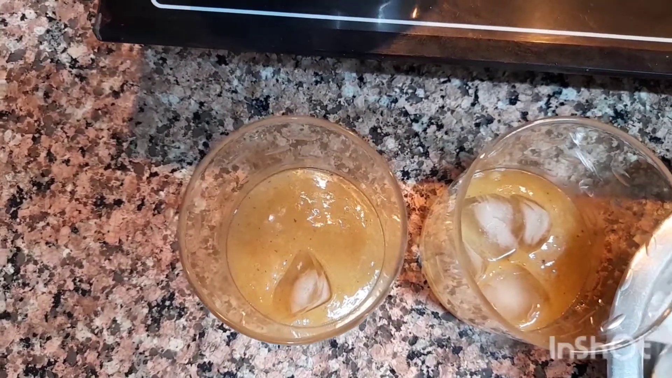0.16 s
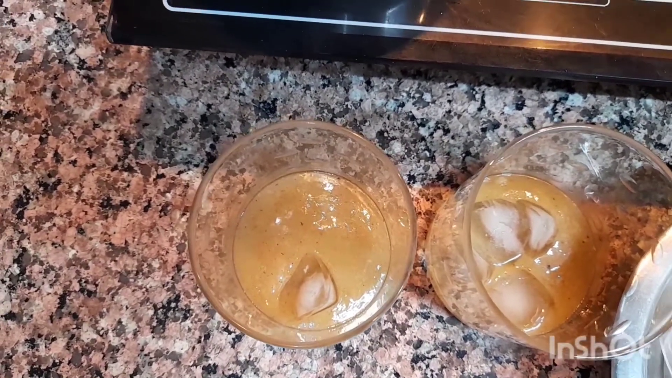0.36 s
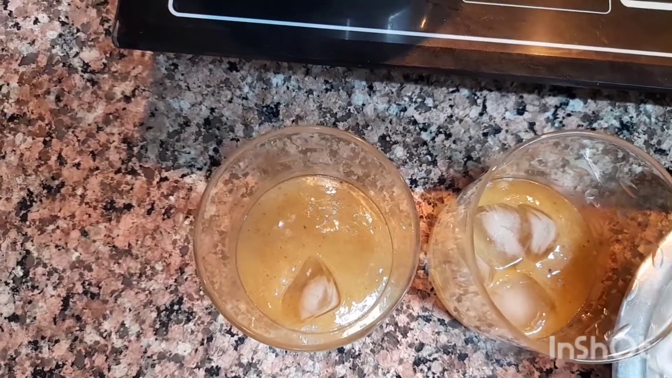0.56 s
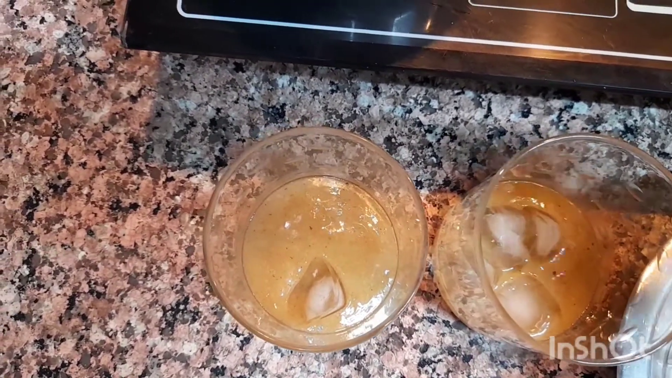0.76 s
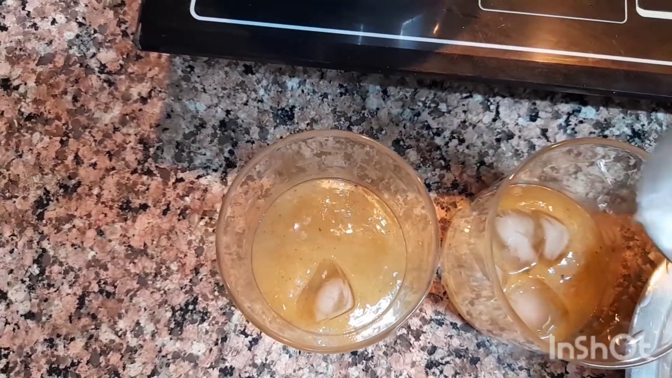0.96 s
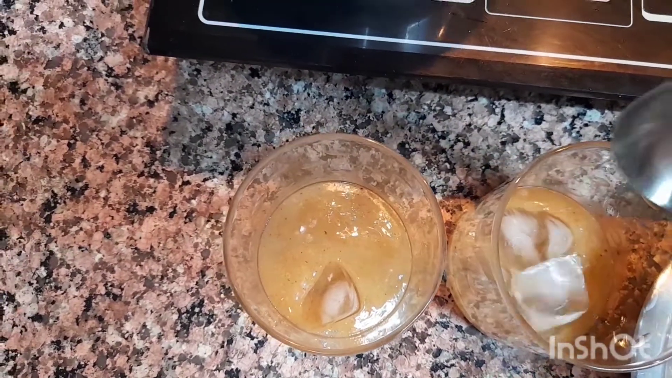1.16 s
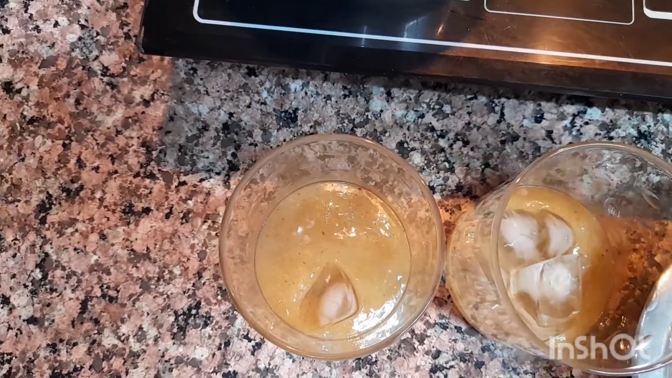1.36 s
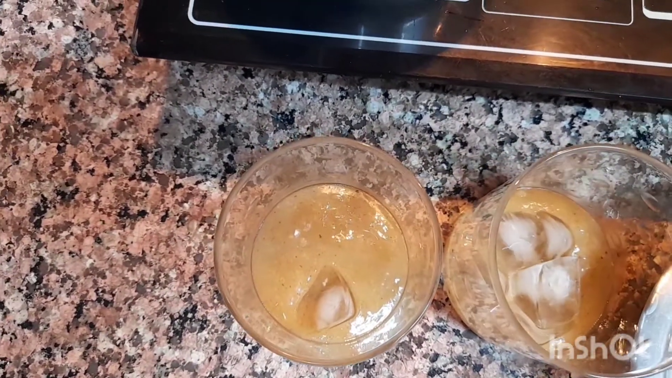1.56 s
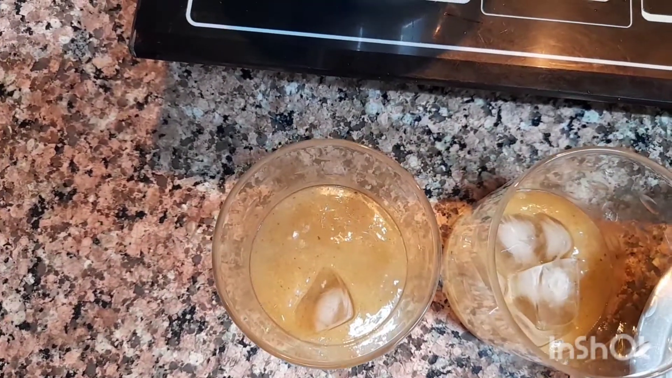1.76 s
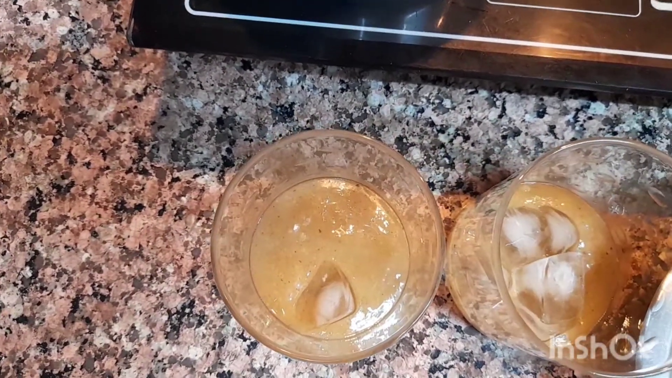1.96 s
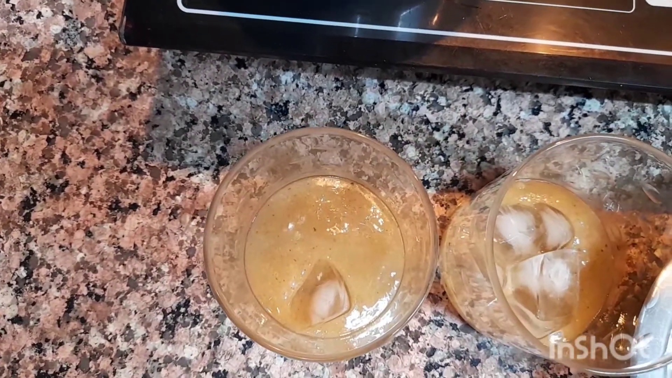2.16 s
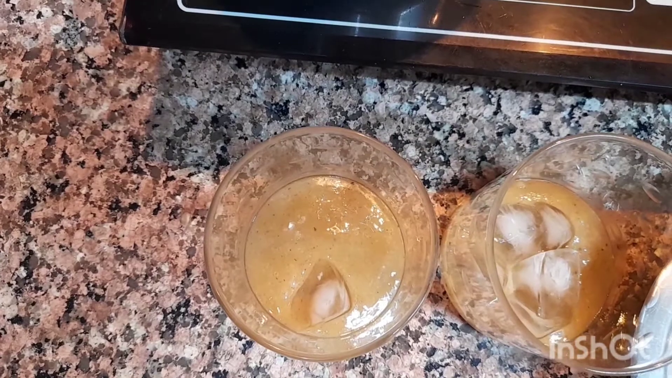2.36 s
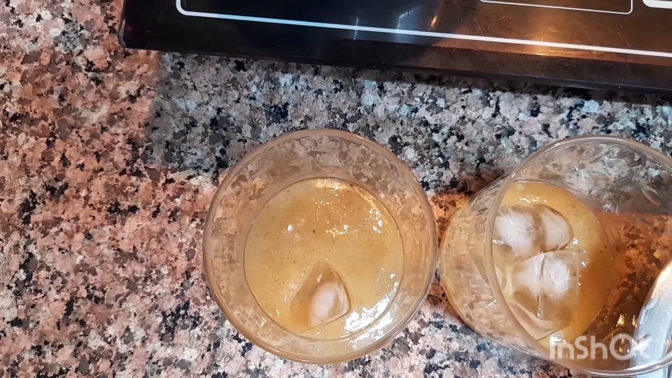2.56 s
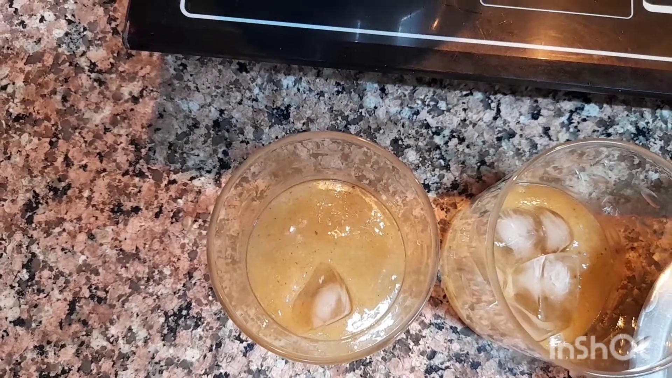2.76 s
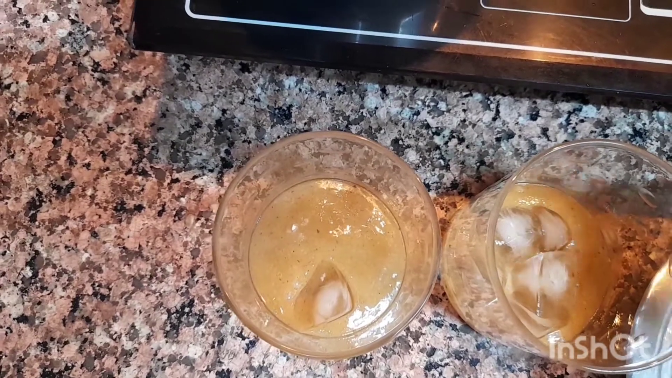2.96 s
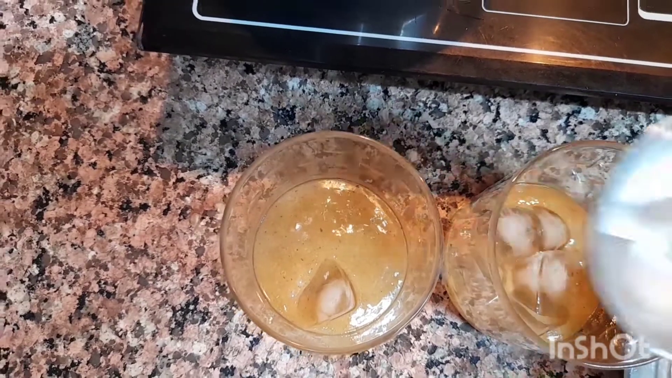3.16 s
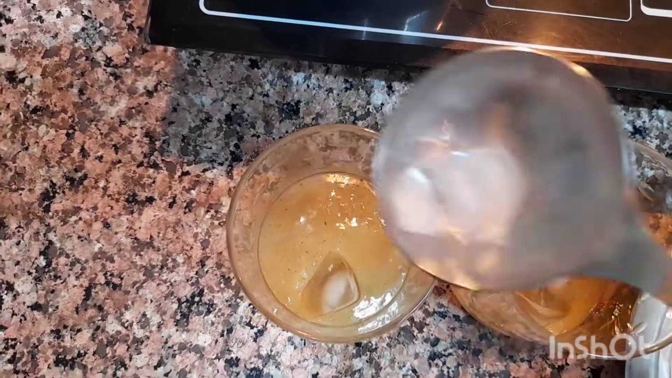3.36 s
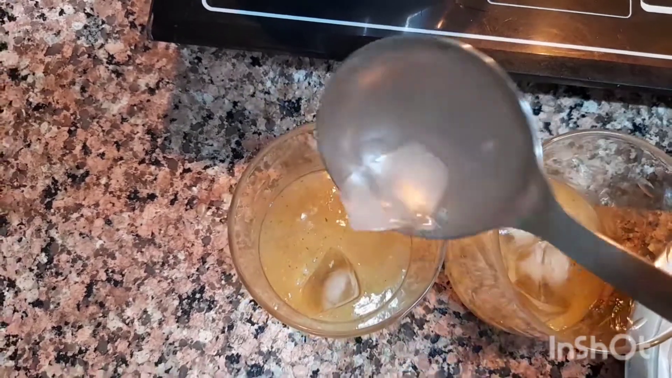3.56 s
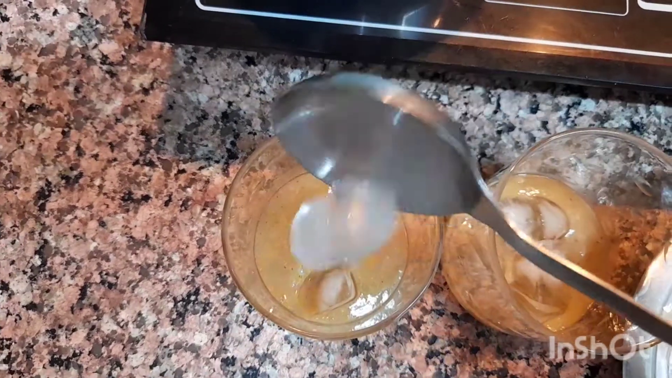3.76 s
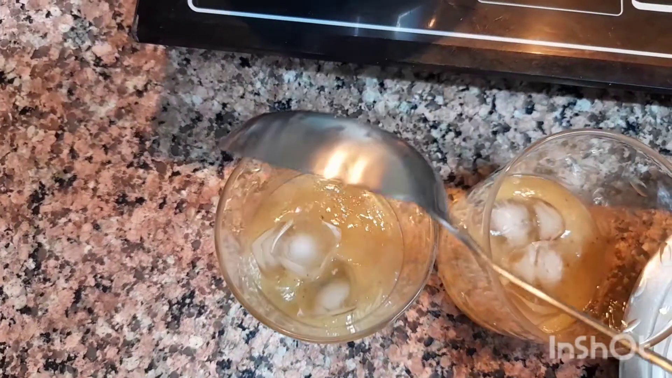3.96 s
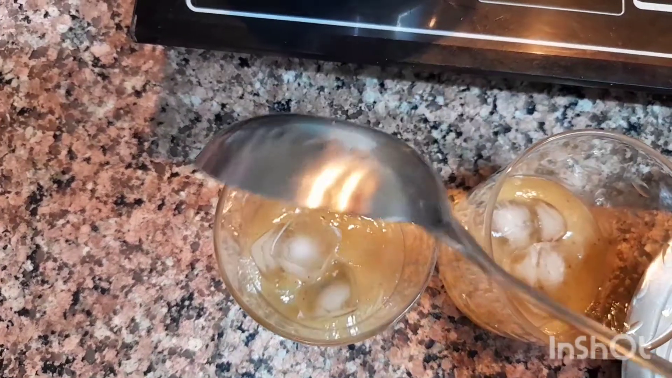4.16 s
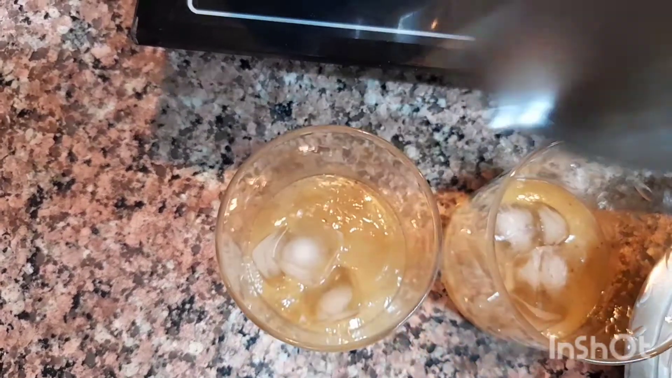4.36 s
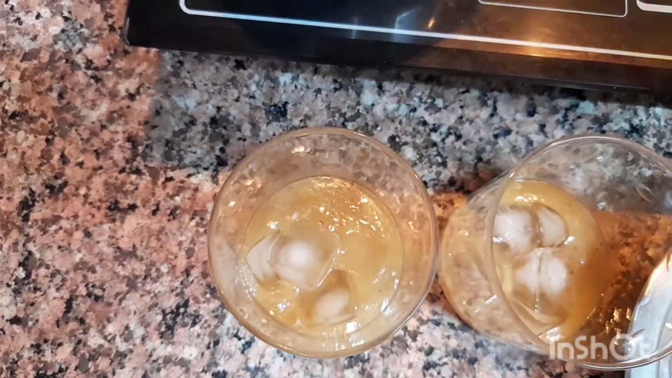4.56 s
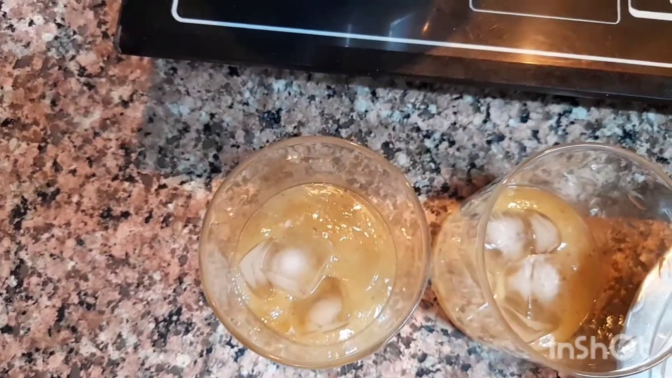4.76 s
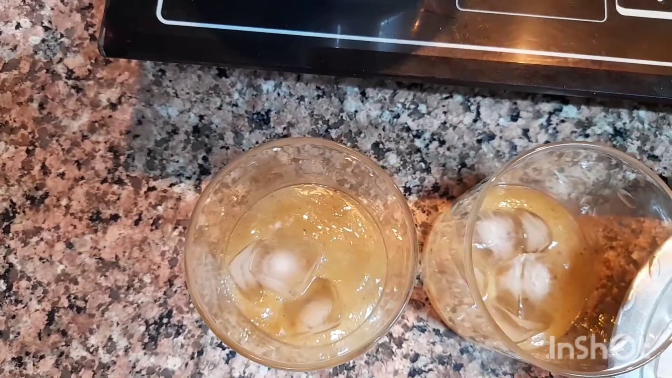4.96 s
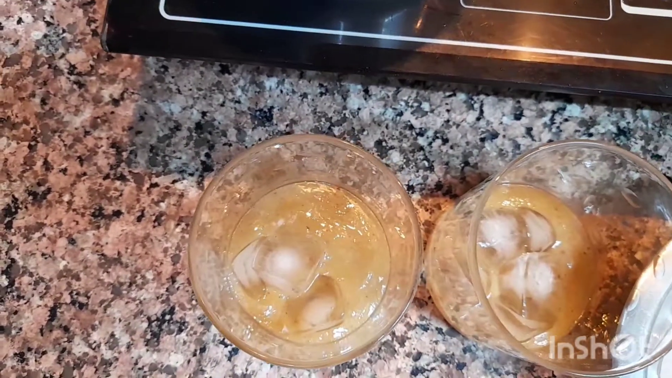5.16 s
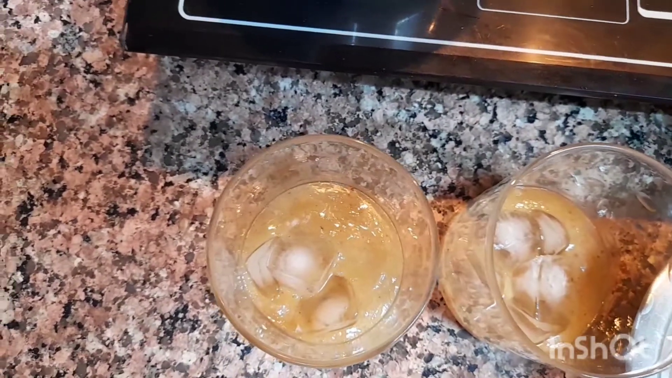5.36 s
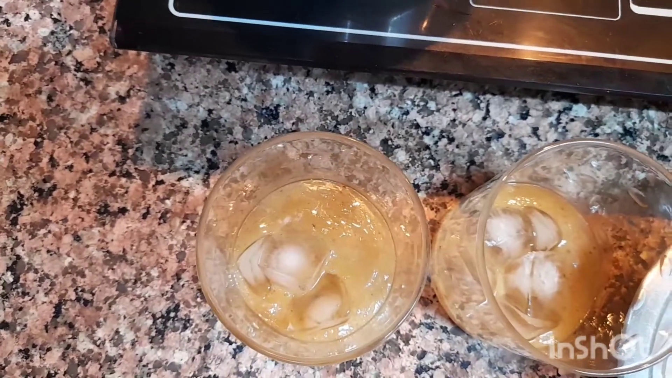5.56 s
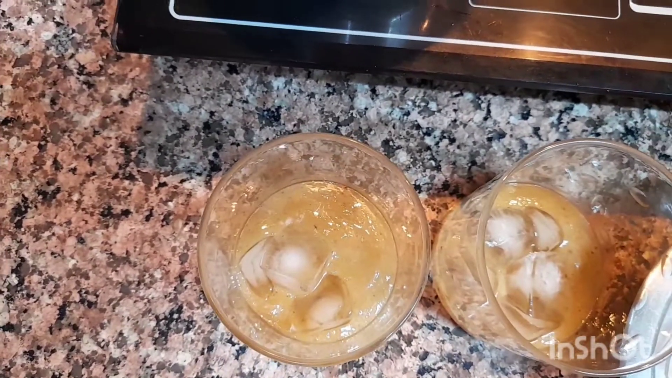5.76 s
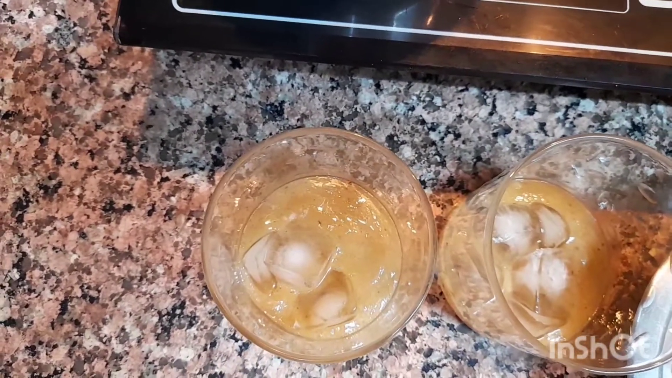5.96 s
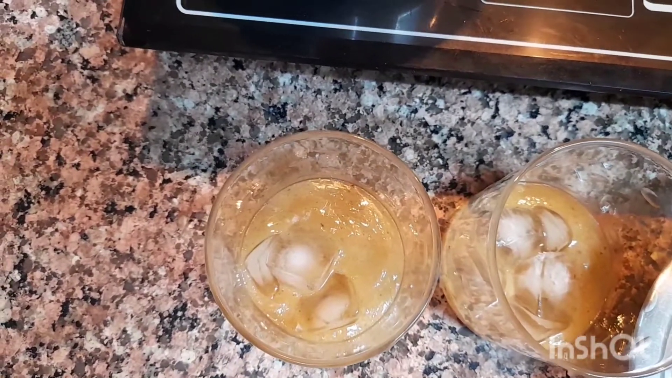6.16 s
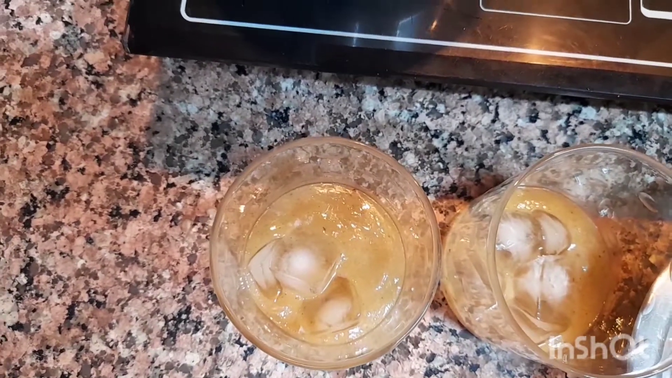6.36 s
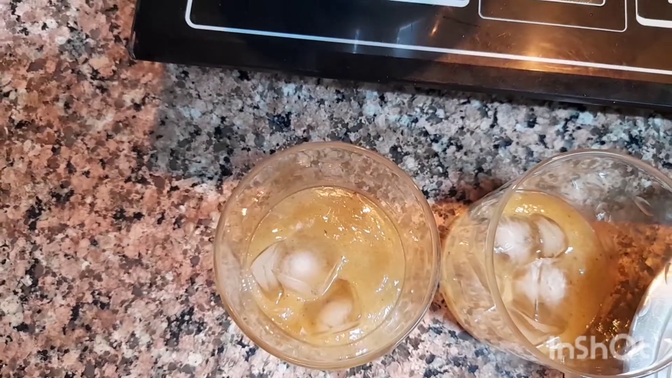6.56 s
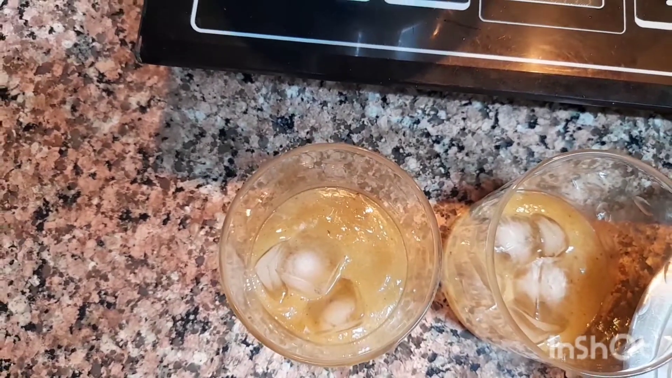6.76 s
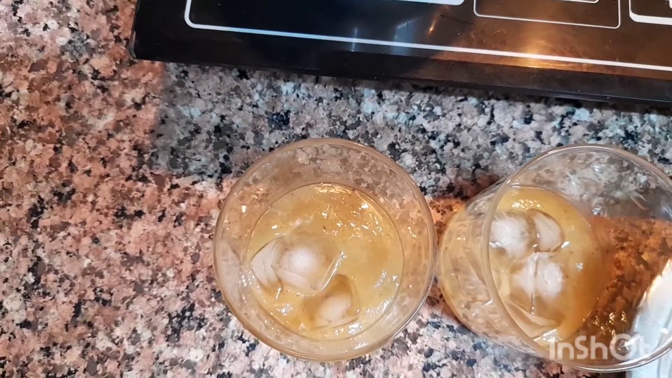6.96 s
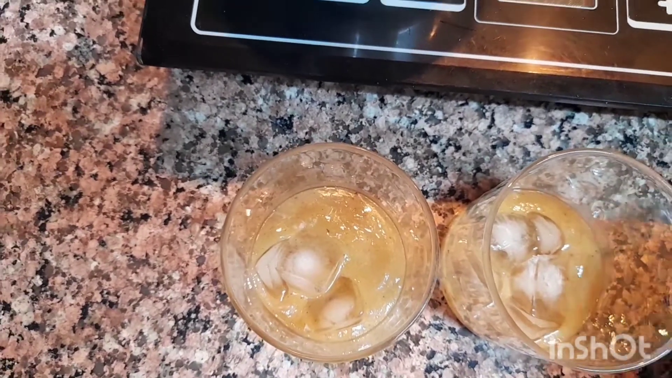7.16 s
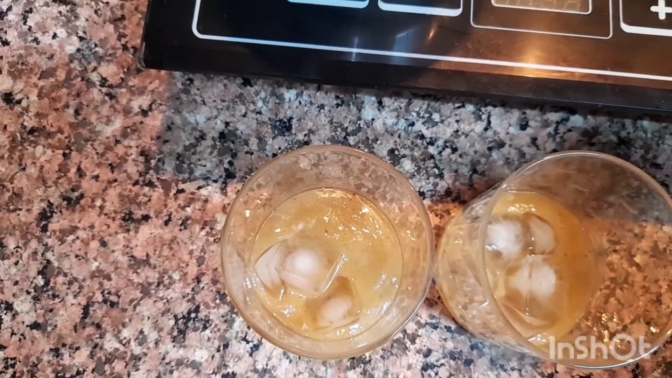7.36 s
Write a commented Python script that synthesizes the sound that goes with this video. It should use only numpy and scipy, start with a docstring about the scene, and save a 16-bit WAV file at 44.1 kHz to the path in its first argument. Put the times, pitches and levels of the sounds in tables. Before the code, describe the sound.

In a small tiled kitchen, a steel ladle digs in a metal bowl of ice: a fading clatter, a cube clinking into a glass, then a denser, louder burst of clacking. More cubes crack into a second tumbler with a brief glassy ring. Duller knocks follow further along the stone counter, with low booms. A last small rattle ends it. Close stereo microphone, short bright echoes, faint hum.

```python
"""Ice into glasses in a tiled kitchen

Close by, a steel ladle digs ice cubes out of a steel bowl: noise cracks over a rasp of tiny slips.
Cubes drop into tumblers on a stone counter, each a crack plus dying sines; the ladle pings, ticks glint.
Further along the counter something is set down with duller knocks, and filtered noise makes it boom.
Decaying random echoes, a hum and low room noise fill the room, heard by a pair of microphone ports."""
import sys
import numpy as np
from scipy import signal
from scipy.fft import rfft, irfft
from scipy.io import wavfile
from scipy.ndimage import uniform_filter1d

SR = 44100
rng = np.random.default_rng(int(sys.argv[2]) if len(sys.argv) > 2 else 0)


def store_wav(level_fs):
    """Save 16-bit WAV to argv[1]."""
    pcm = np.round(np.clip(np.atleast_2d(level_fs), -1, 1) * 32767)
    wavfile.write(sys.argv[1], SR, pcm.T.astype(np.int16))


N = 326781

# Close by, ice sliding on steel as the ladle digs: (start t/s, length t/s, rasp level/dB before the sag)
ICE_SLIDES = [(0, 0.73, -56), (1.611, 0.37, -32), (2.002, 0.36, -35.5), (2.362, 0.16, -36),
              (2.549, 0.32, -53), (2.981, 0.3, -61.5), (7.217, 0.19, -52.5)]
# Colour of ice or cloth rubbing, also used by brushing(): (f/Hz, relative level/dB per Hz)
RASP_SPECTRUM = [(240, -37.5), (400, -3), (1070, -3), (8110, -13), (11900, -12.5), (16000, -16)]
# Cubes clacking in the bowl: (t/s, approximate peak level/dB, note f/Hz, high part level/dB)
ICE_CLACKS = [(0.001, -21, 2080, -23.5), (0.027, -15.5, 1900, -10.5), (0.046, -14, 2010, -11),
              (0.084, -20, 5190, -15), (0.173, -23, 1750, -10), (0.27, -21, 6440, -17.5),
              (0.288, -20, 1990, -24), (0.379, -35.5, 3000, -7), (0.406, -17.5, 1930, -25.5),
              (0.459, -27, 1090, -29), (0.503, -29.5, 2330, -25.5), (0.593, -35.5, 2330, -21),
              (0.62, -25.5, 2320, -34.5), (0.694, -37, 2510, -19), (0.977, -39, 6000, -14),
              (1.621, -22, 1290, -23.5), (1.664, -16, 2670, -4.5), (1.687, -15.5, 4160, -12.5),
              (1.758, -16.5, 1080, -5), (1.791, -13, 1780, -10.5), (1.814, -10.5, 2320, -11),
              (1.87, -14, 1870, -14.5), (1.892, -17, 2280, -15), (1.926, -12, 1850, -8.5),
              (2.007, -20, 5300, -18), (2.02, -17, 1920, -13.5), (2.039, -9.5, 1333, -12.5),
              (2.049, -13.5, 5000, -8.5), (2.078, -12.5, 1350, -10.5), (2.088, -6.5, 3710, -13),
              (2.13, -12, 1990, -10.5), (2.21, -15, 5040, -14), (2.228, -4, 4830, -15.5),
              (2.246, -10.5, 5930, -13), (2.27, -7, 1970, -12.5), (2.319, -19.5, 1990, -13),
              (2.361, -9, 4570, -13.5), (2.387, -8, 5710, -8.5), (2.397, -12, 4130, -14),
              (2.413, -11.5, 2260, -1), (2.449, -13, 3210, -18), (2.551, -17, 2340, -14.5),
              (2.596, -26, 5670, -20), (2.635, -15, 1100, -21), (2.642, -23.5, 5200, -19),
              (2.661, -20, 4730, 8), (2.674, -15.5, 1700, -18), (2.933, -33, 1300, -21.5),
              (3.153, -34, 1880, -13.5), (7.295, -28.5, 4700, -11.5), (7.363, -32.5, 1470, -27),
              (7.395, -24, 5740, -9)]
# Where the steel bowl rings under the ice: (f/Hz, width f/Hz, level/dB before a random factor)
BOWL_MODES = [(1100, 28, 2), (1320, 60, -4.5), (1880, 56, -7), (2300, 60, -4)]
SLIDE_RISE_S, SLIDE_FALL_S, SLIDE_SAG_DB = 0.057, 0.019, -7
# Higher notes come from smaller contacts: they die sooner, by this power, and carry less low part
USUAL_HZ, USUAL_T60_S, SHORTER_POWER = 2030, 0.039, 0.36
USUAL_LOW_DB, LOW_DB_PER_OCTAVE = -11.5, -5.5


def bowl():
    """Clacks over the rasp of sliding ice, which swells, sags and stops; the bowl rings along."""
    ice = np.zeros((2, N))
    for s, length, db in ICE_SLIDES:
        t = np.arange(0, length, 1 / SR)
        edges = np.minimum(t / SLIDE_RISE_S, (length - t) / SLIDE_FALL_S)
        stroke = np.minimum(edges, 1) * amp(db + SLIDE_SAG_DB * t / length)
        rasp = slipping(len(t), RASP_SPECTRUM, per_s=330, spread_db=5.8)
        add(ice, s, stroke * rasp, pan_db=-4.5, lag_s=.00016)
    for s, db, hz, high_db in ICE_CLACKS:
        low_db = USUAL_LOW_DB + LOW_DB_PER_OCTAVE * np.log2(hz / USUAL_HZ)
        t60 = USUAL_T60_S * (USUAL_HZ / hz) ** SHORTER_POWER
        clack = amp(db) * blow(low_db, high_db, hz, note_db=0.8, rise_s=0.00023, t60=t60, low_t60=0.088)
        steel = np.zeros_like(clack)
        for mode_hz, width, mode_db in BOWL_MODES:
            spot = 2 * rng.random()  # struck at another spot each time
            steel += spot * amp(mode_db) * ring(clack, mode_hz, width)
        add(ice, s, clack + steel, pan_db=-5., lag_s=.00016)
    return ice


# Cubes landing in a glass: (t/s, approximate crack peak level/dB, glass ring level/dB relative to that,
# high part level/dB, left over right level/dB)
CUBE_DROPS = [(1.113, -7, -11, -13, -2), (1.13, -16, -8, -1.5, 5), (3.613, -22, -9, -12.5, 5.5),
              (3.791, -26, -4, -29, 6.5), (3.823, -9.5, -8, -9, 2.5), (3.836, -14, -17.5, -23.5, -5)]
# Modes of the glass at its lower pitch: (f/Hz, level/dB, t60 t/s)
TUMBLER_MODES = [(465.5, -7.5, 0.032), (744, -9.5, 0.12), (1043, 3.5, 0.092), (876, -4, 0.065),
                 (1197, -8.5, .06)]
# The first glass, filled until the second takes over, rings higher by this factor
SECOND_GLASS_S, FIRST_PITCH = 3, 1.075


def tumblers():
    """Each landing cube cracks, then the glass and the air in it ring up."""
    out = np.zeros((2, N))
    rise = 1 - np.exp(-np.arange(SR) / SR / 0.0043)
    for s, db, ring_db, high_db, pan_db in CUBE_DROPS:
        pitch = FIRST_PITCH if s < SECOND_GLASS_S else 1
        lag_s = -.00003 * pan_db  # the louder port hears it first
        note_hz = pitch * TUMBLER_MODES[2][0]
        crack = blow(-9.5, high_db, note_hz, note_db=0.65, rise_s=0.0011, t60=0.038,
                     low_t60=0.018, top_db=-10.5)
        glass = rise * sum(struck(TUMBLER_MODES, 1.0, pitch))
        add(out, s, amp(db) * crack, pan_db, lag_s)
        add(out, s, amp(db + ring_db) * glass, pan_db, lag_s)
    return out


# A cube touching the ladle: (t/s, approximate tick peak level/dB, low note level/dB,
# high notes level/dB, t/s until the notes drop, rattle of the low note as a factor)
LADLE_PINGS = [(1.032, -31, -19, -43, 0.078, .12), (3.616, -27.5, -50, -12.5, 0.11, .6),
               (7.219, -35.5, -30, -25, 0.1, 1), (7.317, -20.5, -31.5, -55, 0.026, 1.2)]
# Modes of the ladle before the drop, the low note first: (f/Hz, level/dB, t60 t/s)
LADLE_MODES = [(1465, -0.5, 0.6), (4969, -5.5, 0.1), (7200, -9.5, 0.2)]
NOTE_DROP_DB, NOTE_DROP_S = -15, 0.011


def ladle():
    """A tick, a low note and short, rattling high ones, cut down after a set time."""
    out, t = np.zeros((2, N)), np.arange(SR) / SR
    for s, db, low_db, high_db, free_s, rattle in LADLE_PINGS:
        low = sum(struck(LADLE_MODES[:1], rattle))
        high = sum(struck(LADLE_MODES[1:], 2.3))
        drop = amp(NOTE_DROP_DB * np.clip((t - free_s) / NOTE_DROP_S, 0, 1))
        tick = blow(-7.0, -9.0, 5500, note_db=3.3, rise_s=0.00052, t60=0.0079, low_t60=0.013, top_db=-2.5)
        notes = drop * (amp(low_db) * low + amp(high_db) * high)
        add(out, s, amp(db) * tick, pan_db=-6., lag_s=.0001)
        add(out, s, amp(db) * notes, pan_db=-6., lag_s=.0001)
    return out


# Small bright ticks close by, the first as a cube lands in the glass: (t/s, peak level/dB, note f/Hz)
BRIGHT_TICKS = [(3.845, -27, 7060), (5.1855, -47, 5550), (5.3442, -45.5, 6300)]


def ticks():
    """Each tick is a brief puff of noise, ringing around one high note."""
    out, t = np.zeros((2, N)), np.arange(600) / SR
    for s, db, hz in BRIGHT_TICKS:
        note = ring(ring(rng.standard_normal(len(t)), hz, 3000), hz, 3500)
        tick = amp(-60 * t / 0.0208) * note
        add(out, s, amp(db) * tick / abs(tick).max(), pan_db=.5, lag_s=.0001)
    return out


# Knocks further along the counter: (t/s, approximate peak level/dB, low part level/dB,
# high part level/dB, note f/Hz, note level/dB)
FAR_KNOCKS = [(4.83, -32, 15, -26.5, 598, 18), (5.793, -9.5, -8, -22.5, 2460, -18),
              (5.808, -19, -5, -30.5, 1500, -6), (5.877, -6.5, -3.5, -19.5, 2340, -4.5),
              (5.888, -24, -9.5, -15.5, 2370, -12.5), (6.026, -12.5, 0, -25.5, 2300, -7)]


def knocks():
    """Longer, duller blows: a slow onset, a longer decay and less top."""
    out = np.zeros((2, N))
    for s, db, low_db, high_db, hz, note_db in FAR_KNOCKS:
        knock = blow(low_db, high_db, hz, note_db, rise_s=0.00195, t60=0.085, low_t60=0.09, top_db=-6.5)
        add(out, s, amp(db) * knock, pan_db=-3.5, lag_s=.00038)
    return out


# The counter booms under what is set down or pushed on it:
# (t/s, level/dB, deep ring level/dB, upper ring level/dB)
COUNTER_THUDS = [(1.687, -34, 0, -5), (2.046, -39.5, -1.5, -7), (2.269, -42, 0.5, -4.5),
                 (3.825, -48, 2, -4), (4.835, -41.5, -1.5, -11), (5.801, -45.5, 9, 8),
                 (5.884, -46.5, 3, 10.5), (6.029, -40, -3, 1.5)]
# Modes of the counter, deep ring first and upper ring last: (f/Hz, width f/Hz of each pass, level/dB)
COUNTER_MODES = [(83.7, 20.7, -0.5), (194, 56, -4.5), (468, 45, -8), (322, 96, 2.5)]


def counter():
    """Low modes that build for a moment and die away, nearly alike in both ports."""
    out, t = np.zeros((2, N)), np.arange(SR // 2) / SR
    for s, db, deep_db, upper_db in COUNTER_THUDS:
        shake = pair(len(t), .9)
        modes = [amp(mode_db) * evened(ring(ring(shake, hz, width), hz, width))
                 for hz, width, mode_db in COUNTER_MODES]
        deep, *middle, upper = modes
        boom = amp(deep_db) * deep + sum(middle) + amp(upper_db) * upper
        envelope = amp(db - 60 * t / .6) * (1 - np.exp(-t / 0.0019))
        add(out, s, envelope * boom, pan_db=-2.5, lag_s=.0002)
    return out


# A sleeve or hand brushing past: (middle t/s, level/dB at the middle, t/s to fall to 1/e)
SOFT_BRUSHES = [(4.882, -49.5, 0.032), (6.917, -59.5, 0.031), (6.997, -51, 0.037)]


def brushing():
    """Soft swells of fine friction."""
    out, u = np.zeros((2, N)), np.linspace(-3, 3, 50)
    for s, db, half in SOFT_BRUSHES:
        n = round(6 * half * SR)
        swell = np.interp(np.linspace(-3, 3, n), u, np.exp(-u ** 2))
        friction = slipping(n, RASP_SPECTRUM, per_s=1400, spread_db=5.0)
        add(out, s - 3 * half, amp(db) * swell * friction, pan_db=.5, lag_s=.0003)
    return out


# Decay of the small tiled room: (f/Hz, t60 t/s)
KITCHEN_DECAY = [(200, 0.9), (800, 0.32), (2500, 0.33), (6000, 0.21), (14000, 0.23)]


def kitchen(x, start_s):
    """Sparse echoes of random sign, each band dying at its own speed."""
    taps = np.zeros((2, SR // 2))
    at = np.arange(round(start_s * SR), SR // 2 - 20, 20)
    at = at + rng.integers(0, 20, (2, len(at)))
    np.put_along_axis(taps, at, rng.choice([-1., 1.], at.shape), 1)
    hz, t, z = signal.stft(taps, SR, nperseg=256)
    decay = amp(-60 * t / read(KITCHEN_DECAY, hz)[:, None])
    tail = signal.istft(z * decay, SR, nperseg=256)[1]
    return signal.fftconvolve(x, tail / np.linalg.norm(tail[0]), axes=1)[:, :N]


# Colour of the room noise: (f/Hz, relative level/dB per Hz)
AIR_SPECTRUM = [(30, -12), (69, -21.5), (83, -3.5), (103, -4), (127, -24.5), (325, -15), (677, -32.5),
                (2640, -47), (6280, -45), (15700, -43)]
# How alike the room noise is at the two ports: (f/Hz, left-right likeness, 1 = identical)
PORT_LIKENESS = [(60, 0.34), (400, 0.69), (1500, 0)]
AIR_DB, HUM_HZ, HUM_DB = -60.5, 101.3, -59.5  # rms levels


def air():
    """Steady room noise, most alike in both ports around 400 Hz, with a hum that wavers."""
    frames, hz = N // 512 + 5, np.fft.rfftfreq(2048, 1 / SR)
    a, b, c, d, patches = rng.standard_normal((frames, 1025, 5)).T
    # Slight level patches over time and frequency
    patches = uniform_filter1d(patches, 12, 0)
    patches = evened(uniform_filter1d(patches, 8, 1))
    same = np.clip(read(PORT_LIKENESS, hz), -1, 1)[:, None]
    left = a + 1j * b
    right = same * left + np.sqrt(1 - same ** 2) * (c + 1j * d)
    z = np.array([left, right]) * amp(read(AIR_SPECTRUM, hz)[:, None] + 0.5 * patches)
    noise = signal.istft(z, nperseg=2048, noverlap=1536)[1][:, :N]
    waver = evened(ring(ring(rng.standard_normal(N), HUM_HZ, 22.0), HUM_HZ, 22.0))
    hum = evened(np.sin(2 * np.pi * HUM_HZ * np.arange(N) / SR) + 0.48 * waver)
    return amp(AIR_DB) * evened(noise) + amp(HUM_DB) * hum


def blow(low_db, high_db, hz, note_db, rise_s, t60, low_t60, top_db=0.):
    """A crack of noise with a bump at the note of the struck piece, and a low part; peak near 1."""
    t = np.arange(4096) / SR
    same = np.exp(-t / 0.0021)  # nearby surfaces scatter the later sound differently to each port
    crack_spectrum = [(250, -43.5), (900, -18.5), (1800, -11.0), (4000, high_db / 2 - 4.0),
                      (6200, high_db), (8500, high_db - 2.0 + top_db / 2),
                      (11800, high_db + top_db), (16000, high_db - 14.0 + top_db)]
    crack = coloured(pair(len(t), same), crack_spectrum)
    note = amp(note_db) * evened(ring(crack, hz, .2 * hz))
    body_spectrum = [(120, -55), (400, -25.0), (700, 2.0), (1200, -0.5), (2000, -29.5)]
    body = coloured(pair(len(t), 1.0), body_spectrum)
    # The pieces touch again and again
    chatter = amp(4.5 * evened(uniform_filter1d(rng.standard_normal(len(t)), 40)))
    # The sharp first contact leans to the note
    snap = 6.9 * np.exp(-t / 0.0006) * evened(crack + 1.1 * ring(crack, hz, hz / 2))
    sound = (chatter * crack + note) * amp(-60 * t / t60)
    sound = sound + amp(low_db) * body * amp(-60 * t / low_t60)
    sound = (sound + snap) * (1 - np.exp(-t / rise_s))
    return sound / (3.2 * np.sqrt(np.mean(sound[:, :300] ** 2)))


def struck(modes, rough, pitch=1):
    """Dying sines, one for each mode, blurred by wet or rattling contact, more so the higher they are."""
    t = np.arange(SR) / SR
    partials = []
    for hz, db, t60 in modes:
        blur = evened(ring(rng.standard_normal(SR), hz * pitch, .024 * hz))
        sine = np.sin(2 * np.pi * (hz * pitch * t + rng.random()))
        partials.append(amp(db - 60 * t / t60) * (sine + rough * blur))
    return partials


def slipping(n, spectrum, per_s, spread_db):
    """Tiny slips of uneven size over a thin wash, each a puff of noise with its own pitch."""
    happens = rng.random(n) < per_s / SR
    size = amp(spread_db * np.minimum(rng.exponential(1, n), 2.8)) * happens
    pitches = np.geomspace(1500, 12000, 6)
    which = rng.integers(0, len(pitches), n)
    out = 0.84 * pair(n, 0.54)
    for k, hz in enumerate(pitches):
        energy = signal.lfilter([1], [1, -.975], (size * (which == k)) ** 2)
        puffs = pair(n, 0.87) * np.sqrt(energy)
        out = out + 1.1 * ring(puffs, hz, 0.72 * hz)
    return coloured(out, spectrum)


def pair(n, same):
    """Noise for the two ports, alike by the share same."""
    shared, own = rng.standard_normal(n), rng.standard_normal((2, n))
    same = np.clip(same, 0, 1)
    return np.sqrt(same) * shared + np.sqrt(1 - same) * own


def add(mix, s, sound, pan_db, lag_s):
    """Places a sound in both ports, the left pan_db louder and hearing it lag_s later."""
    for port, gain, at, row in zip(mix, amp([pan_db / 2, -pan_db / 2]), (s + lag_s, s), sound * np.ones((2, 1))):
        part = port[round(at * SR):][:len(row)]
        part += gain * row[:len(part)]


def ring(x, hz, width):
    """A resonance of gain near 1 at its centre; the wider, the sooner it dies."""
    r = np.exp(-np.pi * width / SR)
    return 2 * signal.lfilter([1 - r], [1, -r * np.exp(2j * np.pi * hz / SR)], x).real


def coloured(x, points):
    """Gives x the spectrum of the table, rms 1 over all rows."""
    n = x.shape[-1]
    return evened(irfft(rfft(x) * amp(read(points, np.fft.rfftfreq(n, 1 / SR))), n))


def read(points, hz):
    """Reads a spectrum table on a log axis."""
    f, value = np.transpose(points)
    return np.interp(np.log(hz + 1), np.log(f + 1), value)


def evened(x):
    """Scales to rms 1."""
    return x / np.sqrt(np.mean(x ** 2) + 1e-20)


def amp(db):
    """Decibels to gain."""
    return 10 ** (np.asarray(db) / 20)


def scene():
    """Each place in the kitchen has its own echoes; the far one is the wettest."""
    digging = bowl() + brushing()
    glasses = tumblers() + ladle() + ticks()
    far = knocks()
    echoes = amp(-7.5) * kitchen(digging, .004)
    echoes += amp(-7.0) * kitchen(glasses, 0.0048)
    echoes += amp(-3.0) * kitchen(far, 0.0052)
    return digging + glasses + far + echoes + counter() + air()


def record(dry):
    """The microphones lose the deepest bass and dip in the upper treble; then the band limit."""
    dipped = dry - 0.3 * ring(dry, 9300, 2400)
    thinned = signal.lfilter(*signal.butter(2, 45., "high", fs=SR), dipped)
    band_limit = signal.firwin(511, 16200, window=("kaiser", 9), fs=SR)  # cutoff in Hz
    return signal.oaconvolve(thinned, band_limit[None], "same")


dry = scene()
out = record(dry)
store_wav(out)
```